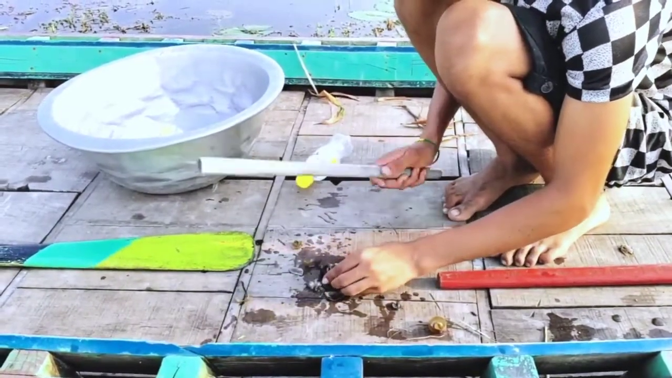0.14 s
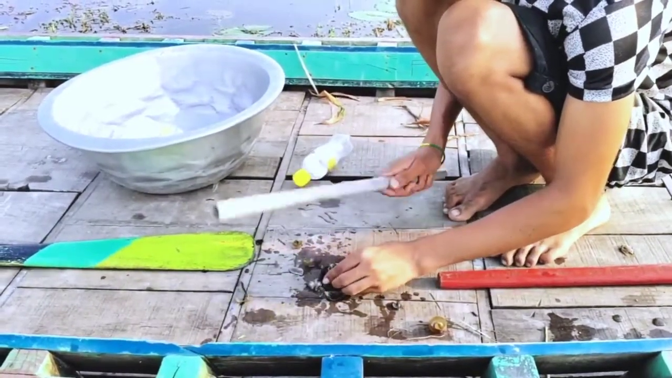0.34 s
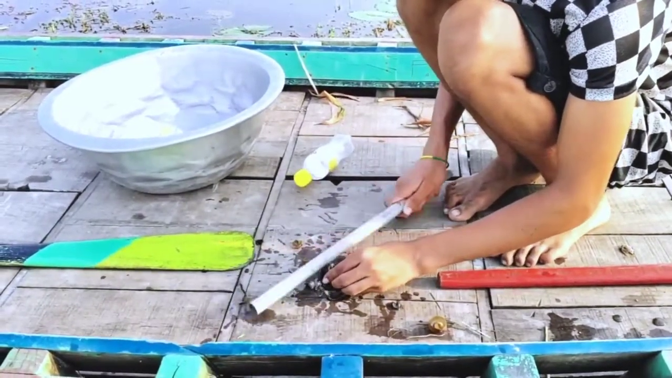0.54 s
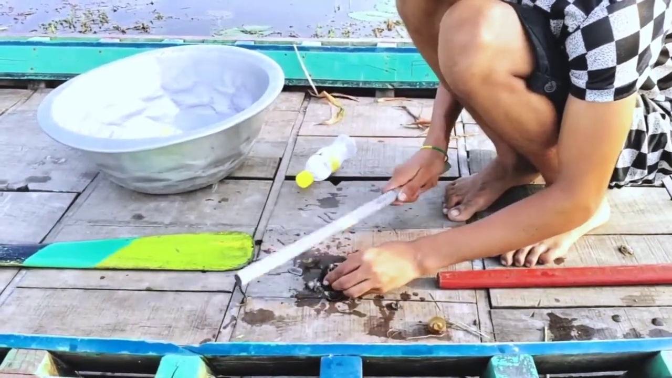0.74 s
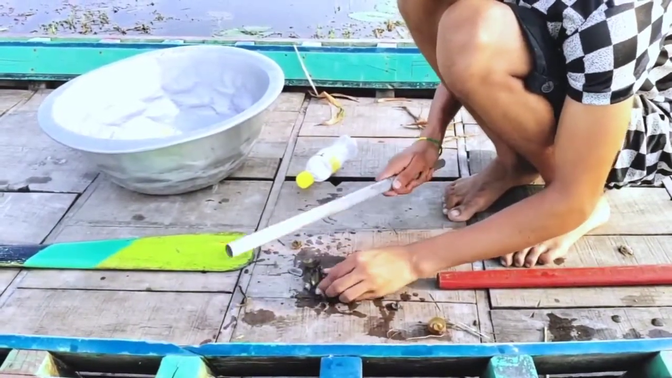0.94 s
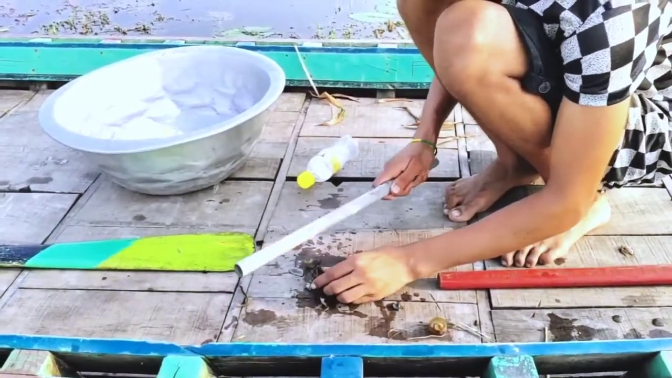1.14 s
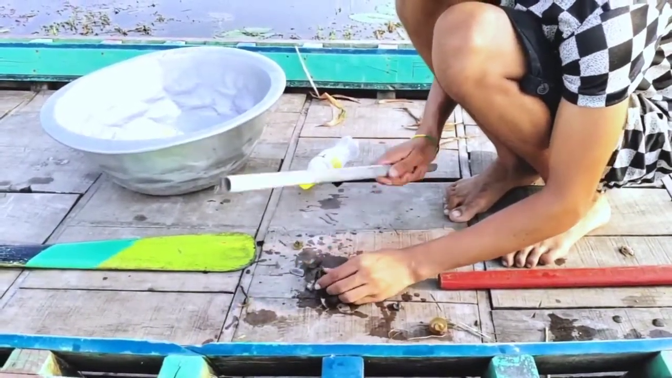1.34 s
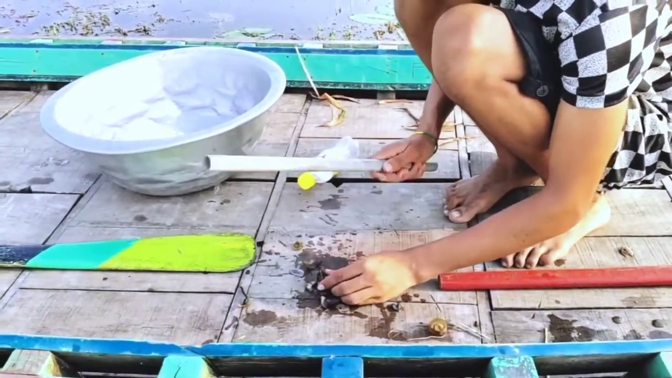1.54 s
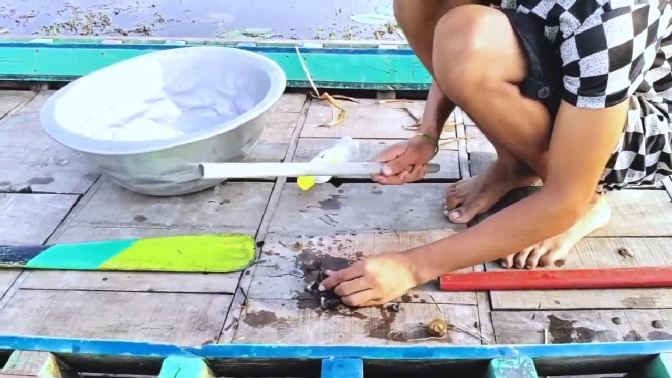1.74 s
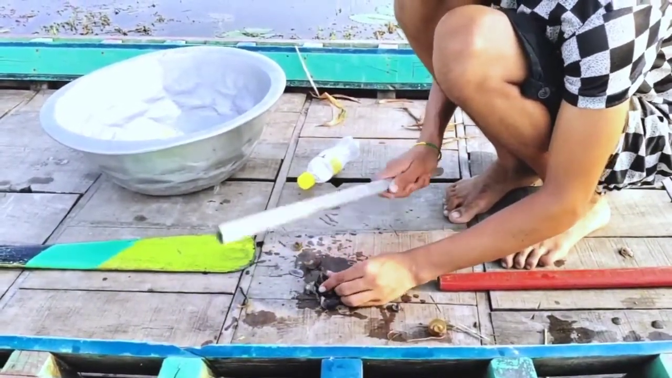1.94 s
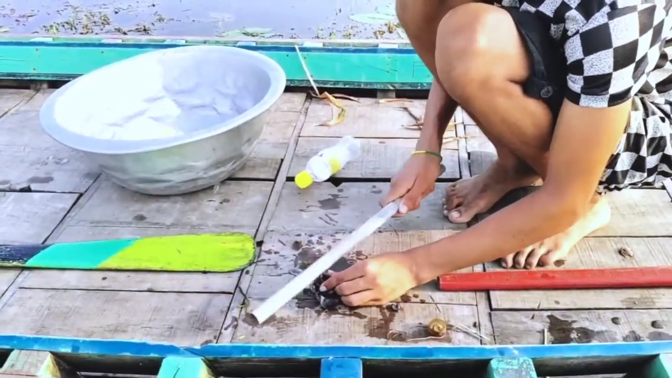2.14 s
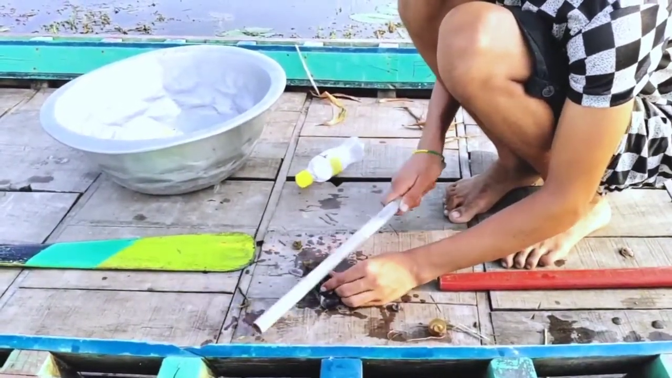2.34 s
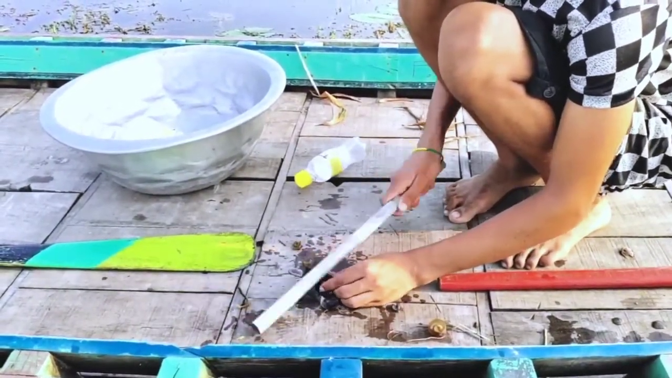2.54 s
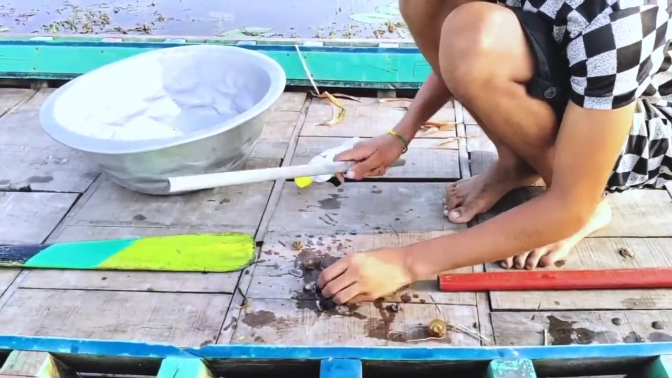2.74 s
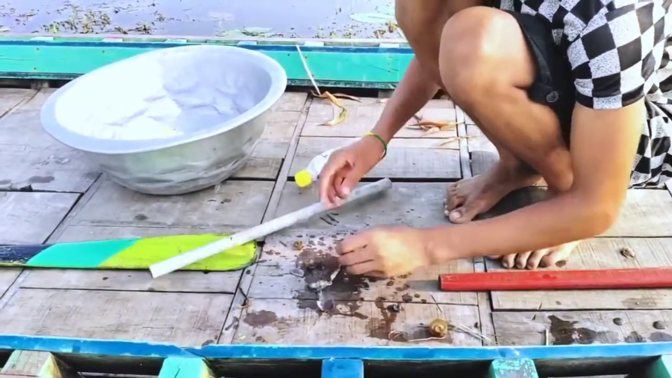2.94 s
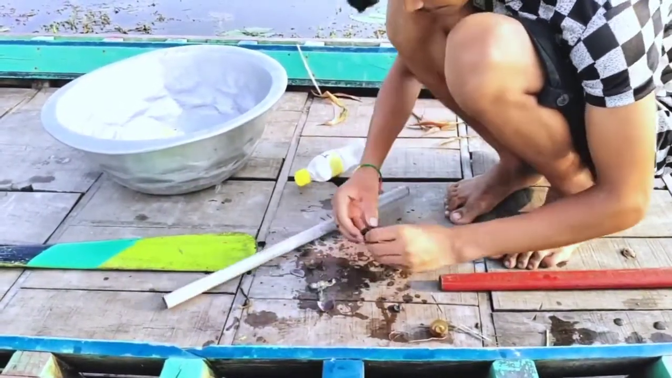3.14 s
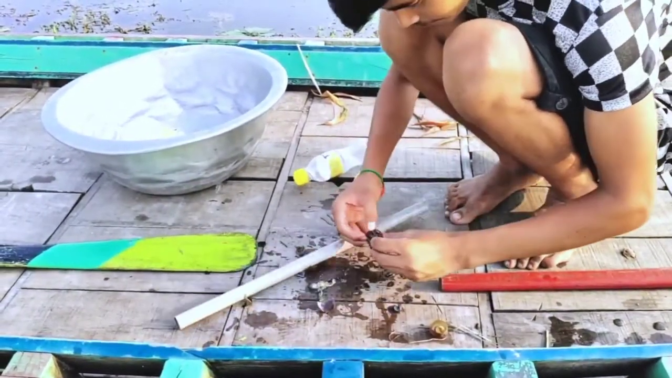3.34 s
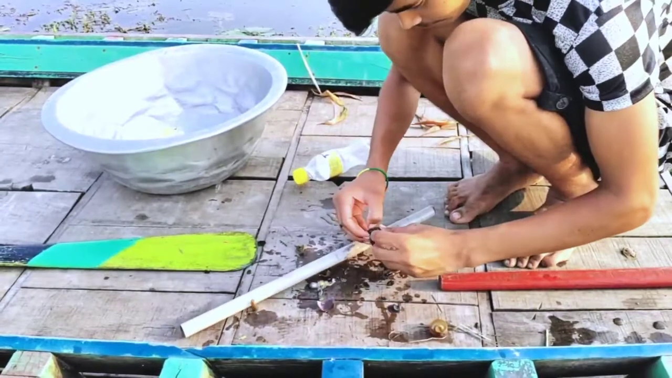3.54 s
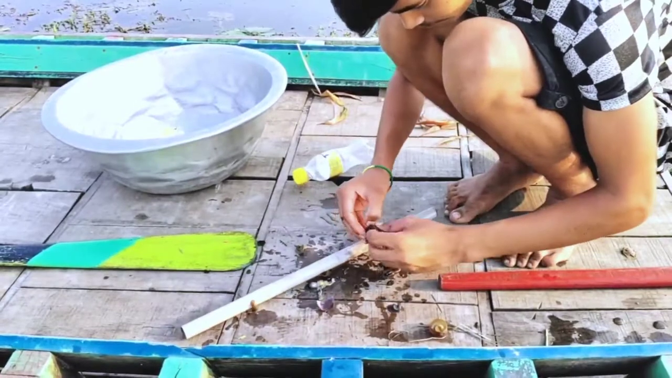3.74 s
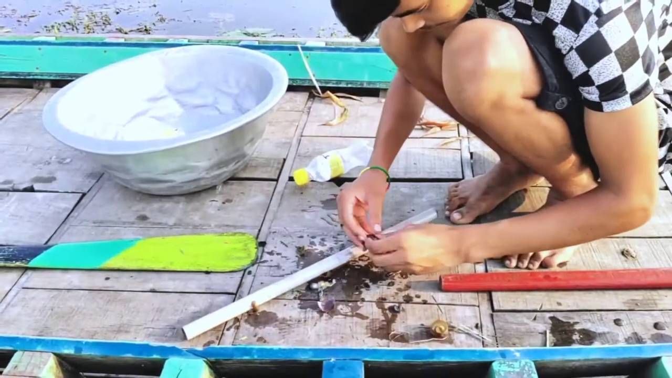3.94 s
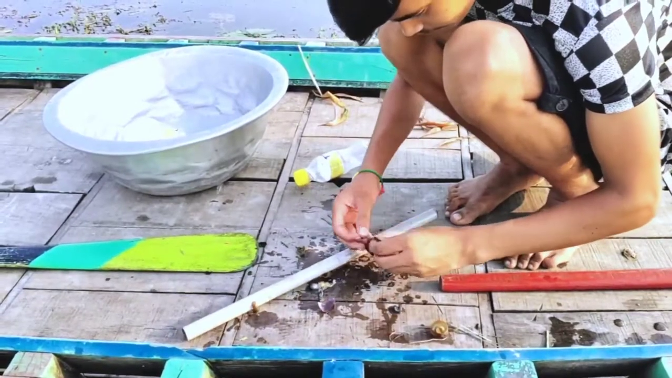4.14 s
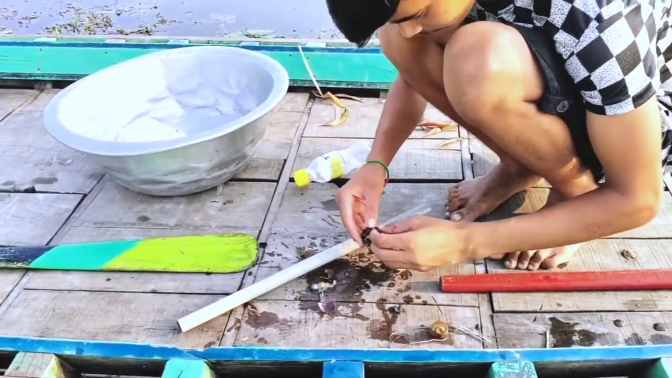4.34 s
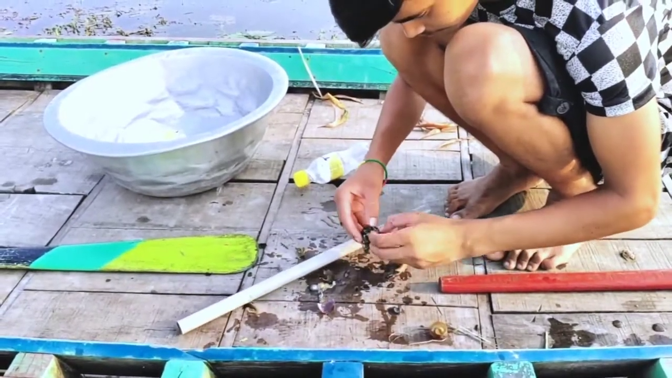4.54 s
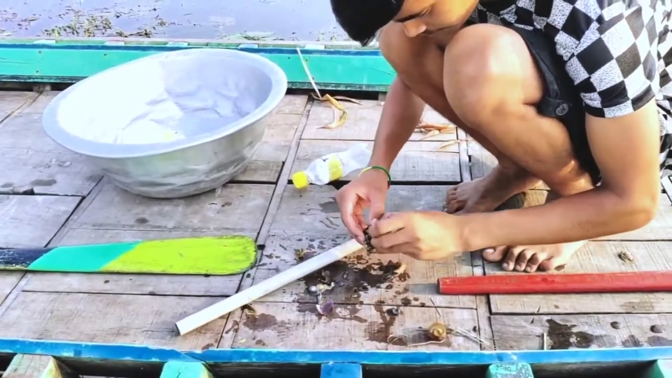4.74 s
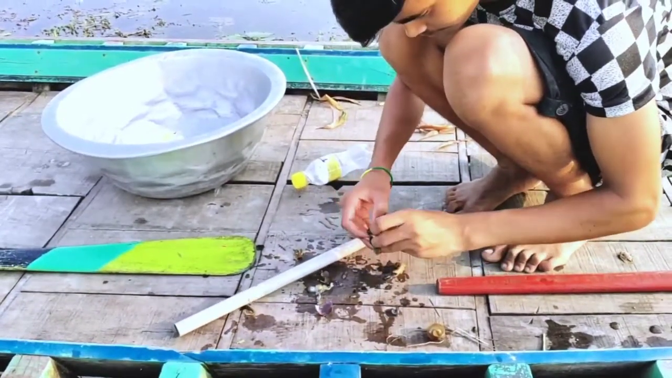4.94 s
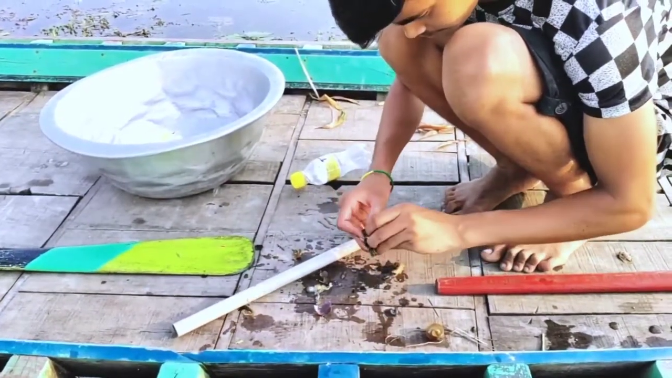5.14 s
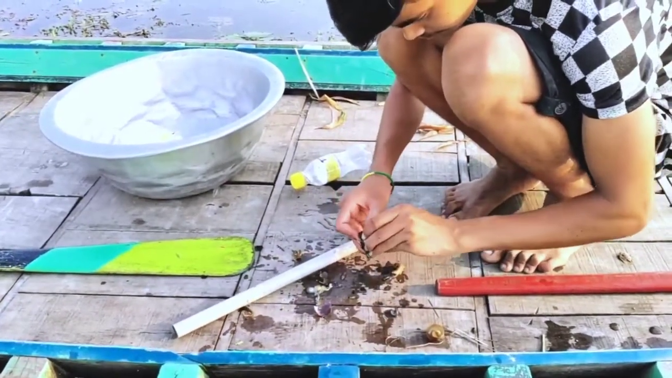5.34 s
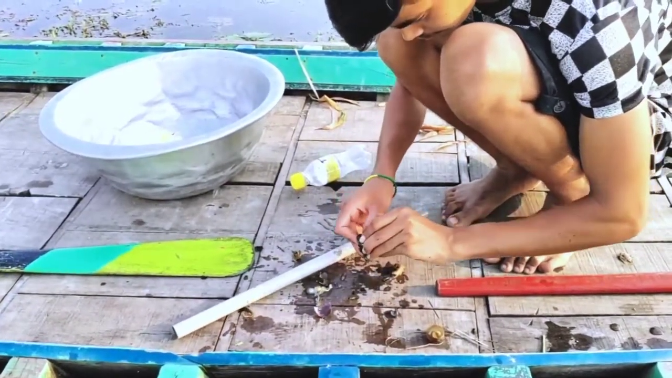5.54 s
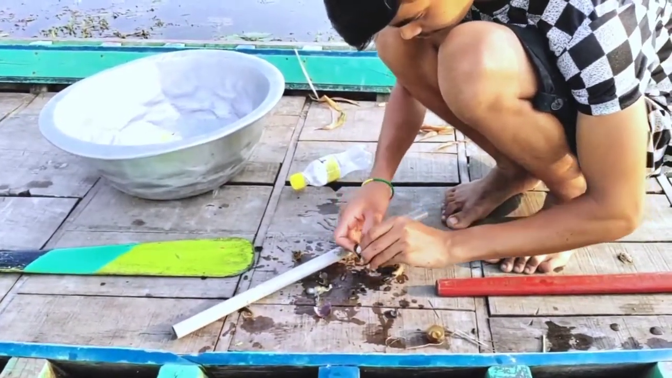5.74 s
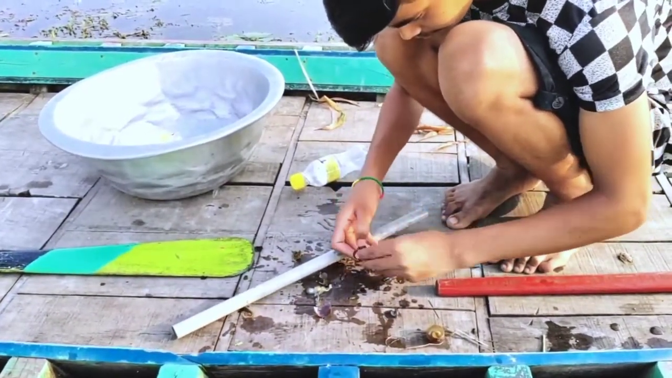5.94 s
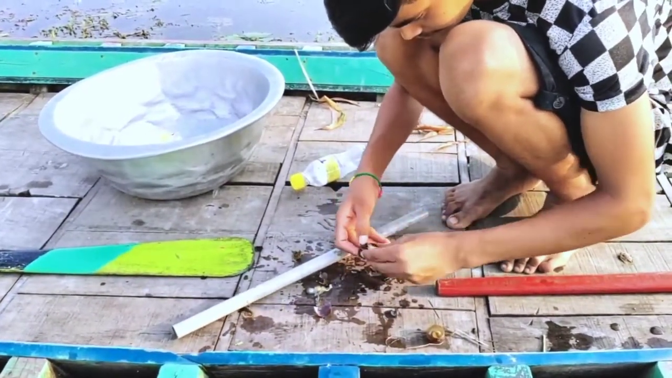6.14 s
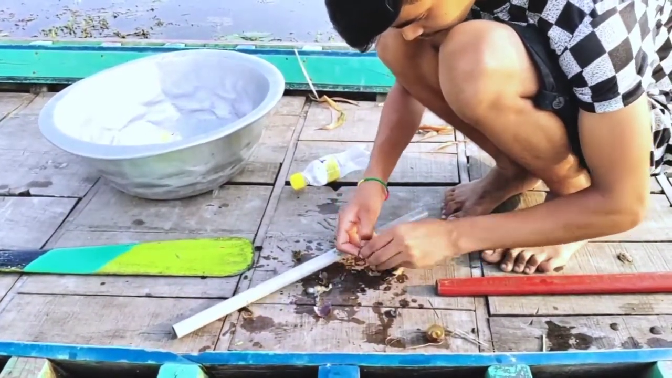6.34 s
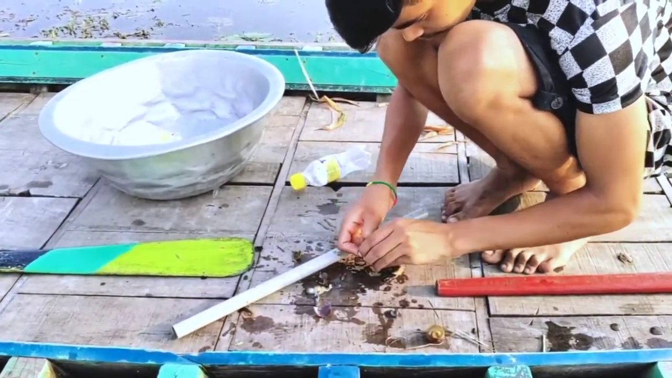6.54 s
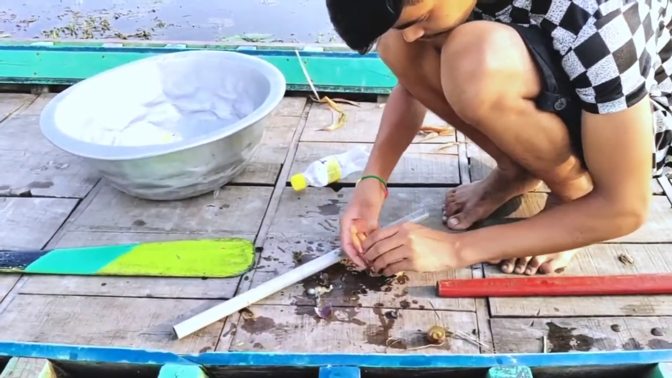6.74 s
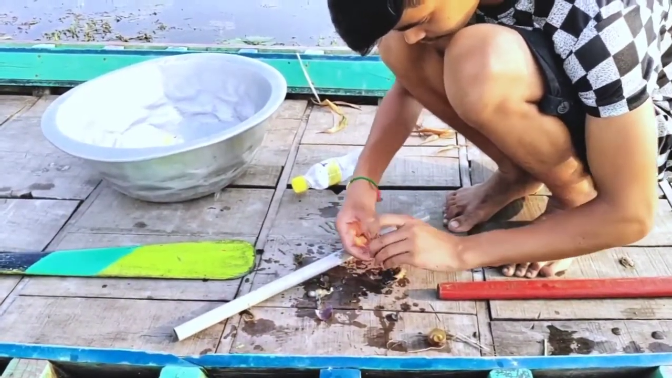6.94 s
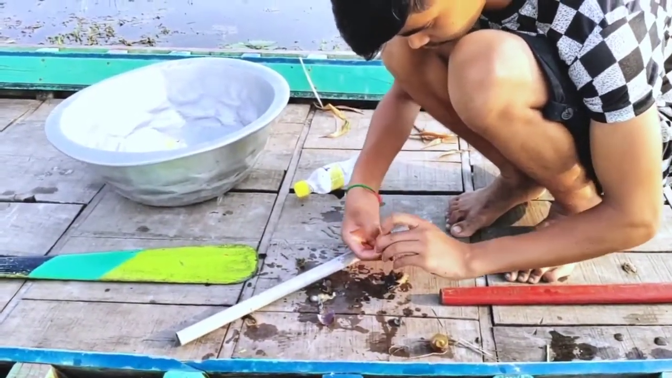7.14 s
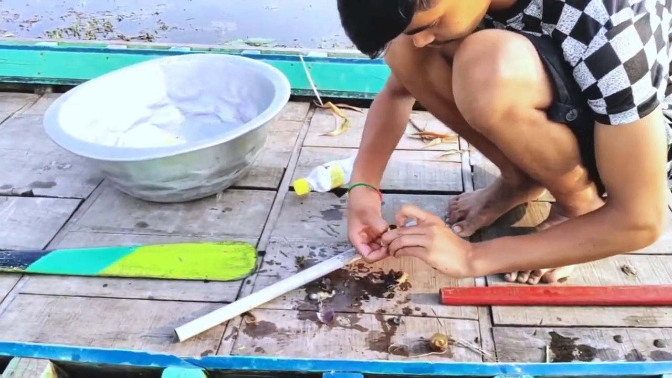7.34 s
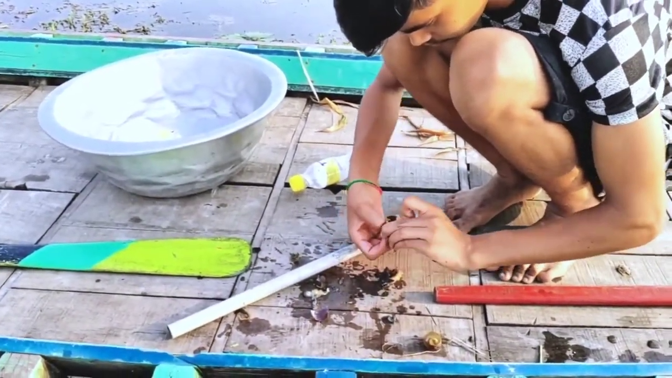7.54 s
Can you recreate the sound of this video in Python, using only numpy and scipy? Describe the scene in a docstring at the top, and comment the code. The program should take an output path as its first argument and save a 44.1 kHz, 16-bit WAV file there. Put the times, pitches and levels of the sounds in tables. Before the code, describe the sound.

Quick cracking knocks on a wooden boat deck, a bouncing pipe drop and low thuds, then quiet fiddling with shell over calm outdoor water ambience.

```python
"""A plastic pipe knocks snail shells on the planks of a wooden boat, is dropped and bounces, close to the microphone:
each blow drives modes of hull, deck, shell and pipe, with filtered noise for crack, crunch and wash.
Fingers tick, rustle and scrape at a shell as gritty noise; the hull rumbles and thuds as weight shifts.
Across the water a frog clucks in short sine blips, a far motor putts in noise puffs, insects hiss in
flickering narrow bands and a few birds whistle in gliding sines, over open air, broad hiss and wind."""
import sys
import numpy as np
from scipy import signal
from scipy.fft import rfft, irfft
from scipy.io import wavfile
from scipy.ndimage import uniform_filter1d

SR = 44100
rng = np.random.default_rng(int(sys.argv[2]) if len(sys.argv) > 2 else 0)


def generate_wav(sig):
    """Save sig (samples, or channels by samples) to the path in sys.argv[1] as 16-bit PCM at SR."""
    pcm = np.round(np.clip(np.atleast_2d(sig).T, -1, 1) * 32767).astype(np.int16)
    wavfile.write(sys.argv[1], SR, pcm)


N = 339217

# every contact of the pipe: start_s, level_db of the whole blow, then the layers under it: hull_boom_db,
# deck_db, shell_db, pipe_db, crack_db; chatter_s, rebound strength (0-1),
# share of its ring time that the hand leaves the pipe
CONTACTS = [(0.087, -6.5, -19.5, -5.5, -9.5, -10.5, -9, 0.041, 0.14, 0.34),
            (0.108, -19, -5, -10.5, -11, -23, -26, 0.014, 0.12, .35),
            (0.298, -4, -21, -7.5, -22, -11.5, -11, 0.036, 0.24, 0.44),
            (0.318, -16, -7, -13.5, -10, -16, -23, 0.019, 0.28, 0.24),
            (0.428, -45, -16, -12.5, -7, -15, -19.5, 0.014, 0, .35),
            (0.483, -8.5, -18, -16.5, -7, -6.5, -4, 0.038, 0.36, .4),
            (0.512, -9.5, -25.5, -4, -12, -16, -28.5, 0.046, 0.03, 0.39),
            (0.531, -17.5, -17, -7.5, -17.5, -19, -30.5, .025, 0, .35),
            (0.65, -4, -19.5, -8, -12.5, -9.5, -8, 0.044, 0.22, 0.26),
            (0.693, -12.5, -20, -5.5, -19, -22.5, -32.5, 0.024, 0, 0.29),
            (0.783, -11, -11.5, -2, -8.5, -6, -5.5, 0.028, 0.23, 0.3),
            (0.802, -17, -7.5, -6, -10, -18, -19, 0.025, 0.46, 0.45),
            (1.325, -20.5, -7, -5, -13, -2.5, -5, 0.044, 0.01, 0.21),
            (1.511, -15, -12, -5, -12.5, -9, -1.5, 0.034, 0.09, 0.59),
            (1.73, -9.5, -14, -11, -15.5, -14.5, -3.5, 0.034, 0.18, 0.23),
            (1.788, -42, -12, -7, -16, -20, -20, 0.026, 0.1, .35),
            (1.912, -11.5, -9, -9.5, -13, -9.5, 0, 0.037, 0.13, 0.32),
            (2.08, -9, -14.5, -5, -13, -16, -8, 0.037, 0.53, 0.37),
            (2.251, -9, -17.5, 1, -15, -17, -5.5, 0.03, 0.08, .35),
            (2.265, -14.5, -15.5, -9, -7.5, -12, -28, 0.026, 0.47, 0.32),
            (2.429, -9, -14.5, -3.5, -11.5, -16, -6.5, 0.052, 0.32, 0.55),
            (2.658, -9.5, -15, -3.5, -10.5, -11, -4, 0.032, 0.25, 0.4),
            (2.92, -43, -22.5, -34, -15, 7, -26, 0.014, 0.35, 0.44),
            (2.928, -8.5, -25, -22, -21, -5, -8.5, 0.015, 1, 0.64),
            (2.947, -13.5, -12, -10, -11.5, -24, -5.5, 0.026, 0.11, .5),
            (2.963, -9, -22.5, -28, -20, -6.5, -10.5, 0.017, 0.3, 0.67),
            (2.99, -20.5, -13.5, -25, -13, -6, -6, 0.049, 0.31, 0.85),
            (3.022, -34.5, 0, -20, -14, -9, -6, 0.049, 1, 0.97),
            (3.036, -27.5, 4, -2, -13, -25, -30, 0.012, 0.6, .5),
            (3.045, -20.5, -10, -6, -6.5, -15.5, -6, 0.02, 0.07, 0.45),
            (3.082, -21, -11, -6.5, -13.5, -28, -18, 0.0072, 1, 0.44),
            (3.097, -37, 1, -4, -11.5, -26, -26, 0.028, .5, .5),
            (3.141, -43, -4, -8, -11, -26, -30, 0.018, 0.7, .5),
            (3.107, -47, -16, -7, -14, -20, -19, .04, 0.4, .5)]


def undb(db):
    """Decibels to an amplitude factor."""
    return 10 ** (np.asarray(db) / 20)


def curve(rows):
    """Table rows to sample-rate columns."""
    s, *columns = np.transpose(rows)
    return [np.interp(np.arange(N) / SR, s, c) for c in columns]


def colour(x, points):
    """Filter by (Hz, dB) points, joined over log frequency."""
    hz, db = np.transpose(points)
    f = np.maximum(np.arange(x.shape[-1] // 2 + 1) * SR / x.shape[-1], 1)
    gain = undb(np.interp(np.log(f), np.log(hz), db))
    return irfft(rfft(x) * gain, x.shape[-1])


def unit(x):
    """Scale to an RMS of 1."""
    return x / np.sqrt(np.mean(x ** 2))


def peak(x, db):
    """Scale to a peak in dB."""
    return x * undb(db) / np.abs(x).max()


def pair(n, alike):
    """Two noises, left and right, that share a part."""
    mid, side = rng.standard_normal((2, n))
    alike = np.clip(alike, 0, 1)
    return np.sqrt((1 + alike) / 2) * mid + np.sqrt((1 - alike) / 2) * side * np.array([[1], [-1]])


def late(x):
    """The right port hears it later."""
    bank_lag_s = .00032
    return np.array([x[0], np.roll(x[1], int(bank_lag_s * SR))])


def band(x, hz, width):
    """One resonance, width in Hz."""
    return signal.lfilter(*signal.iirpeak(hz, hz / width, SR), x)


def band_twice(x, hz, width):
    """The same resonance twice, for steeper skirts."""
    return band(band(x, hz, width), hz, width)


def walk(rate):
    """Random levels held 1 / rate s and slewed twice."""
    k = int(SR / rate)
    steps = np.repeat(rng.standard_normal(N // k + 1), k)
    return 1.8 * uniform_filter1d(uniform_filter1d(steps, k), k)[:N]


def add(out, s, x, pan_db):
    """Mix x in at s seconds; pan is left minus right."""
    i = int(s * SR)
    x = x * undb(np.array([[pan_db], [-pan_db]]) / 2)
    out[:, i:i + x.shape[1]] += x[:, :N - i]


def swell(rows, rise, fall_db_s):
    """Gain over time of (s, dB, hold s) pushes: a ramp, a hold, an even fall in dB; powers add."""
    t, power = np.arange(N) / SR, 0
    for s, db, hold in rows:
        ramp = np.clip((t - s) / rise, 0, 1)
        fall_db = fall_db_s * np.maximum(t - s - rise - hold, 0)
        power = power + (ramp * undb(db - fall_db)) ** 2
    return np.sqrt(power)


def after(db, fall_db_s):
    """Gain of what each blow leaves behind."""
    return swell([(row[0], row[1] + db, 0) for row in CONTACTS], 0.023, fall_db_s)


def ring(modes, force, spread, scatter_db, free=1, detune=.03, loose=1, count=3):
    """Each mode is a cluster of close neighbours; a contact point weights them anew,
    each port hears its own phase; loose = 0 starts all modes in step."""
    t = np.arange(len(force)) / SR
    hz, db, t60 = np.repeat(np.transpose(modes), count, axis=1)[:, :, None]
    u = rng.standard_normal((4, len(hz), 1))
    fade = undb(db + scatter_db * u[0] - 60 * t / (free * t60))
    turn = 2 * np.pi * (hz * (1 + detune * u[1]) * t + loose * u[3])
    ports = np.array([(fade * np.sin(turn + spread * sign * u[2])).sum(0) for sign in (1, -1)])
    return signal.fftconvolve(ports, force[None])[:, :len(force)]


def wind():
    """Wind on the ports: deep noise, separate left and right, that swells slowly."""
    return unit(band_twice(pair(N, 0), 42, 50)) * undb(-79.0 + 2.2 * walk(3.1))


def open_air():
    """Open-air noise, nearly the same at both ports."""
    # spectrum of the air: frequency_hz, gain_db
    air_points = [(15, -24.5), (25, 0), (157, 6), (1160, -16), (1440, -94.5), (1610, -13.5), (2410, -27.5),
                  (4030, -52), (4610, -40.5), (6560, -10), (7510, -29), (13600, -24.5), (16000, -28)]
    air_db = -71
    return late(unit(colour(pair(N, 0.94), air_points))) * undb(air_db + 3.0 * walk(8.7))


def hiss():
    """A broad hiss that the blows stir up and that sinks evenly in dB to its resting level."""
    under_blow_db, fall_db_s, rest_db = -64, 74, -90.5
    stirred = undb(rest_db) + after(under_blow_db, fall_db_s)
    points = [(600, -7.0), (1500, 7.0), (4000, 1.0), (9000, 0.5), (15000, -5.0), (15500, -35.0)]  # Hz, dB
    return unit(colour(pair(N, 0.24), points)) * stirred * undb(1.7 * walk(23))


def insects():
    """Narrow noise bands that flicker alone, louder on the right."""
    # voices of the chorus: frequency_hz, filter_width_hz, level_db
    voices = [(1623, 160, 3.5), (1890, 150, -2.5), (2090, 110, -4), (2220, 50, -13.5), (2610, 110, -4.5),
              (2850, 140, -6.5), (3144, 200, -1.5), (3380, 130, -6.5), (3620, 87, -10.5), (3982, 260, 2.5),
              (4302, 230, -0.5), (4980, 170, -7), (5430, 270, -5), (5580, 170, -3.5), (6070, 290, -4.5),
              (6400, 260, 1.5), (6700, 300, -1.5), (6900, 110, -8)]
    # the whole chorus: time_s, level_db
    chorus_levels = [(0.0, -61.5), (0.9, -67.5), (1.7, -76.5), (2.33, -68), (2.85, -77.5), (4.15, -73),
                     (6.2, -71.5), (6.4, -77.5), (7.1, -68), (7.69, -81)]
    bands = 0
    for hz, width, db in voices:
        flicker_db = 2 * walk(18) + 2.9 * walk(2.5)
        voice = band(band_twice(pair(N, 0.14), hz, width), hz, width)
        bands = bands + undb(db + flicker_db) * unit(voice)
    (level_db,) = curve(chorus_levels)
    return unit(late(bands)) * undb(level_db + np.array([[-1.5], [1.5]]))


def birds():
    """Far gliding whistles, blurred by the air."""
    # whistles: start_s, length_s, start_hz, middle_hz, end_hz, level_db
    whistles = [(1.24, 0.05, 4900, 5100, 4700, -63.5), (5.854, 0.075, 4670, 4660, 4620, -78),
                (1.533, 0.22, 1280, 1490, 1640, -71.5), (3.544, 0.35, 1760, 2086, 2180, -77.5),
                (3.769, 0.081, 4980, 4650, 4300, -73), (5.299, 0.73, 2103, 2094, 2090, -78.5),
                (5.3, .13, 2110, 1970, 2010, -86), (6.51, 0.13, 2070, 2070, 2060, -78.5),
                (6.787, 0.21, 1700, 1923, 1965, -72.5), (6.855, 0.3, 2060, 2160, 2130, -75)]
    out = np.zeros((2, N))
    for s, length, *hz, db in whistles:
        u = np.linspace(0, 1, int(length * SR))
        pitch = np.polyval(np.polyfit([0, .5, 1], hz, 2), u)
        slow = uniform_filter1d(rng.standard_normal((2, len(u))), 400)
        blur = unit(uniform_filter1d(slow, 400))
        turn = 2 * np.pi * np.cumsum(pitch) / SR
        x = np.sin(np.pi * u) * ((1 + blur[0]) * np.sin(turn) + blur[1] * np.cos(turn))
        add(out, s, undb(db) * np.array([np.roll(x, 9), x]), -4.0)
    return out


def motor():
    """A far single-cylinder motor, louder on the right: even puffs whose strength wavers with the air."""
    # resonances of the puffs: frequency_hz, filter_width_hz, level_db
    resonances = [(780, 200, -9.5), (1240, 88, -5.5), (1270, 33, -4.5), (3660, 2300, -1.5),
                  (4050, 400, 2.5), (5470, 630, 1)]
    first_s, period_s = .0598, .0616
    since = (np.arange(N) / SR - first_s) % period_s
    puffs = pair(N, 0.17) * np.exp(-since / 0.0091) * np.minimum(since / 0.0031, 1)
    x = 0
    for hz, width, db in resonances:
        x = x + undb(db + 1.6 * walk(27)) * unit(band_twice(puffs, hz, width))
    return x * undb(-93.0 + np.array([[-2.0], [2.0]]))


def putts():
    """Now and then a putt of the motor carries hollow over the water: a ragged puff in two resonances."""
    # putts that stand out of the beat: start_s, peak_db, pitch_hz, overtone_db against the pitch
    hollow_putts = [(.245, -54.5, 860, -10), (.737, -46.5, 800, -4), (1.045, -79, 1130, -10),
                    (1.785, -51, 874, -4), (1.847, -62, 860, -12), (1.97, -51, 800, -2),
                    (4.371, -71, 795, -3), (4.68, -72, 850, -4.5), (4.741, -72, 897, 0),
                    (4.803, -71.5, 800, -3.5), (5.05, -70, 1044, -4), (5.111, -74, 880, 1),
                    (5.173, -72, 900, 3), (5.604, -68.5, 900, -3), (5.912, -69.5, 800, -11),
                    (6.158, -73, 890, 2), (7.145, -67, 1200, -10), (1.107, -60, 730, -3),
                    (1.169, -59.5, 692, -5.5), (1.23, -73, 824, -35), (1.415, -64, 830, -30),
                    (1.661, -60, 870, -43.5), (2.832, -69.5, 884, -28), (3.325, -57, 816, -30),
                    (3.571, -51.5, 712, -5), (3.694, -64, 877, -11), (3.756, -59, 813, -31),
                    (4.19, -65.5, 830, -32), (3.277, -59, 860, -28), (4.433, -61, 770, -23),
                    (4.495, -64, 845, -25.5), (4.556, -51, 972, -6), (4.618, -54.5, 1014, -18),
                    (4.865, -54.5, 880, -8.5), (4.925, -52, 890, -3), (4.987, -70.5, 880, -20),
                    (5.234, -61.5, 749, -7), (5.296, -56, 872, -13.5), (5.357, -63, 855, -6.5),
                    (5.419, -60.5, 850, -8), (5.481, -64, 834, -16), (5.542, -60, 836, -4),
                    (5.727, -53.5, 746, -3), (5.789, -59.5, 834, -23), (6.035, -61.5, 808, -31),
                    (6.096, -56.5, 864, -11), (6.219, -56.5, 935, 1), (6.28, -62.5, 855, -6),
                    (6.343, -58.5, 790, 0), (6.405, -66.5, 808, 16), (6.466, -64.5, 783, -21.5),
                    (6.528, -60.5, 830, -9), (6.589, -59.5, 1020, 11), (6.651, -62.5, 975, 10),
                    (6.897, -57.5, 732, -1), (6.959, -68, 944, -11), (7.021, -63, 960, 11),
                    (7.328, -66, 920, 20.5)]
    rise_s, fall_s, width_hz, overtone_hz = 0.0029, 0.012, 100, 1266
    out, t = np.zeros((2, N)), np.arange(int(.1 * SR)) / SR
    shape = np.minimum(t / rise_s, 1) * np.exp(-np.maximum(t - 2 * rise_s, 0) / fall_s)
    for s, db, hz, overtone_db in hollow_putts:
        x = 0
        for f, gain_db in ((hz, 0), (overtone_hz, overtone_db)):
            # the filter settles before the part that is kept
            breathy = band_twice(rng.standard_normal(3 * len(t)), f, width_hz)[-len(t):]
            x = x + undb(gain_db) * shape * (np.sin(2 * np.pi * f * t) + 0.66 * unit(breathy))
        add(out, s, peak(np.array([np.roll(x, 5), x]), db), -.6)
    return out


def rasps():
    """Short gritty puffs of exhaust gas in the upper mids."""
    # rasps that stand out of the beat: time_s, peak_db, frequency_hz, left_minus_right_db
    exhaust_rasps = [(4.2454, -68.5, 4040, -7.5), (4.7398, -66.5, 4200, -5), (4.928, -65, 3930, -8),
                     (5.0524, -66, 3860, -11), (5.1716, -65, 3580, -10.5), (5.239, -70, 3990, -5.0),
                     (5.418, -68, 3520, -9.5), (5.5424, -65, 3550, -10.5), (5.668, -63, 3860, -9.0),
                     (5.727, -56, 3620, -10), (5.8012, -68, 3940, -10.0), (5.8581, -62.5, 4020, -10),
                     (5.929, -60.5, 4650, -6), (5.9766, -66.5, 3920, -11.5), (6.0407, -61, 3880, -9.5),
                     (6.0963, -60, 3920, -10.5), (6.2796, -59, 4100, -6.0), (6.3494, -75, 4420, -3.5),
                     (6.6577, -62, 3970, -11), (6.774, -61.5, 3820, -10), (6.8365, -66, 3990, -7),
                     (6.9007, -52.5, 3760, -7), (6.9576, -59, 3910, -10.0), (7.0255, -61, 4010, -9),
                     (7.0858, -64, 4010, -12), (7.143, -56.5, 3880, -8)]
    rise_s, fall_s, width_hz = .003, 0.015, 670
    out, t = np.zeros((2, N)), np.arange(int(.1 * SR)) / SR
    shape = np.minimum(t / rise_s, 1) * np.exp(-t / fall_s)
    for s, db, hz, pan_db in exhaust_rasps:
        puff = band_twice(pair(len(t), 0.21) * shape, hz, width_hz)
        add(out, s - rise_s, peak(puff, db), pan_db)
    return out


def blip(hz, length):
    """A slightly rough sine blip, echoed from the bank; the right port hears it first."""
    t = np.arange(int(.1 * SR)) / SR
    shape = np.sin(np.pi * np.clip(t / length, 0, 1)) ** 4.3
    rough = 1 + 0.5 * unit(uniform_filter1d(rng.standard_normal(len(t)), 60))
    x = shape * rough * np.sin(2 * np.pi * hz * t)
    x = x + 0.17 * np.roll(x, 900)
    return np.array([np.roll(x, 5), x])


def frog():
    """Short low clucks at an even pace, each a little different in pitch and level."""
    # how loud the clucks are: time_s, mean peak_db
    cluck_levels = [(0.0, -53), (1.0, -60), (1.3, -68.5), (3.5, -63.5), (4.302, -66), (5.2, -62.5),
                    (5.75, -55.5), (5.85, -78.5), (6.9, -71), (7.69, -79)]
    first_s, period_s, cluck_s, mean_hz, scatter_db = .085, .0991, .018, 635, 4
    out, (s, db) = np.zeros((2, N)), np.transpose(cluck_levels)
    for at in np.arange(first_s, N / SR, period_s):
        u = rng.standard_normal(2)
        cluck = blip(mean_hz * (1 + 0.038 * u[0]), cluck_s)
        add(out, at, peak(cluck, np.interp(at, s, db) + scatter_db * u[1]), 3.5)
    return out


def hull():
    """Soft uneven pushes of feet and water keep the lowest plank modes going; a few are clear thuds."""
    # weight shifting on the planks: start_s, level_db, hold_s
    shifts = [(0.0, -54.5, 0.031), (2.74, -62.5, 0.023), (2.97, -40.5, 0.51), (3.3, -42.5, 0.12),
              (3.46, -42.5, 0.16), (3.56, -43, 0.18), (3.8, -52.5, 0.2), (4.0, -47.5, 0.045),
              (4.07, -58, .07), (4.2, -53.5, 0.049), (4.68, -70, 0.21), (5.1, -68.5, 0.13),
              (6.03, -63, 0.038), (6.72, -53.5, 0.075), (6.9, -60.5, 0.025), (7.1, -61.5, 0.14)]
    # clear thuds: start_s, peak_db, pitch_hz, t60_s
    thuds = [(3.225, -26, 154, 0.055), (3.58, -36.5, 130.4, 0.11), (3.674, -28.5, 146, 0.052),
             (4.013, -39.5, 105.7, 0.069), (4.128, -44.5, 141.4, 0.11), (6.044, -56.5, 89, 0.17),
             (6.722, -45.5, 120, 0.031), (6.748, -45, 129, 0.081), (6.79, -45.5, 130, 0.23),
             (1.464, -48.5, 377, 0.054), (3.124, -46, 500, 0.069), (3.145, -47.5, 683, .07),
             (3.193, -47.5, 640, 0.091), (3.26, -58, 655, 0.065), (3.365, -41.5, 472, 0.033),
             (3.384, -39, 419, 0.042)]
    # where the weight bears: time_s, left_minus_right_db
    bearing = [(2.9, 2), (3.6, 2.5), (4.0, 8), (4.4, -2), (6.6, -1), (6.74, 14), (6.95, -1), (7.69, -3)]
    rise_s, fall_db_s, rest_db = 0.011, 160, -86.5
    under_blow_db, blow_fall_db_s = -52.5, 83.5  # rumble left by a blow
    push = swell(shifts, rise_s, fall_db_s) + after(under_blow_db, blow_fall_db_s) + undb(rest_db)
    strength = undb(3. * walk(60))
    body = 0
    # plank modes: Hz, filter width Hz, dB, share alike at both ports
    for hz, width, db, alike in ((91, 110, 0.0, 0.075), (146, 83, 3.5, 0.21), (191, 115, -5.5, 0.25)):
        body = body + undb(db) * band_twice(strength * pair(N, alike), hz, width)
    out, t = unit(body) * push, np.arange(int(.2 * SR)) / SR
    for s, db, hz, t60 in thuds:
        x = np.sin(2 * np.pi * hz * t) * undb(-60 * t / t60) * np.minimum(t / 0.0043, 1)
        add(out, s, peak(x, db)[None], 0)
    return late(out) * undb(curve(bearing)[0] * np.array([[.5], [-.5]]))


def rustle():
    """Fingers on wet shell: sparse tiny crackles, each smeared by a short ring, louder on the right."""
    # the rustling: time_s, level_db
    crackle_levels = [(3.1, -76), (3.3, -76), (3.44, -73), (3.6, -82), (3.999, -91.5), (4.3, -89),
                      (4.43, -79.5), (4.6, -94), (5.35, -90), (5.7, -85), (5.85, -93.5), (6.18, -77.5),
                      (6.5, -88.5), (7.129, -78.5), (7.358, -93), (7.69, -97)]
    (db,) = curve([(3.05, -130), *crackle_levels])
    sparse_db = 3 * np.minimum(rng.exponential(size=N), 7) + 3.5 * walk(50)
    grains = pair(N, .2) * undb(sparse_db)
    x = unit(band_twice(grains, 3200, 3300)) + .5 * unit(band_twice(grains, 1100, 900))
    return x * undb(db + np.array([[-2.5], [2.5]]))


def ticks():
    """Fingers and shell scraps: short noise snaps with a faint ring and a gritty tail."""
    # ticks: start_s, body peak_db, ring_hz, treble_db against the body, left_minus_right_db
    tick_rows = [(1.833, -52, 3700, -2, 8), (3.194, -44, 1290, -49, 0), (3.24, -37.5, 2820, 0.5, -4),
                 (3.256, -51, 1290, -19, -2.5), (3.3405, -44, 2850, 2, -3), (3.363, -40, 1470, -38, -0.5),
                 (3.393, -54, 2780, -14, -1), (3.418, -42, 2500, -7, 2), (3.446, -45, 5100, -7, -1),
                 (3.53, -44.5, 5120, 0, 1), (4.3133, -44, 5360, 3.5, 0), (4.39, -47, 2840, -7, -2),
                 (4.4, -56, 3030, -16, -6), (4.42, -58, 5000, -12, -3), (4.446, -59, 4490, -18, -1),
                 (4.6235, -63, 4300, -2, 4), (5.125, -56, 6080, -27.5, -5), (5.239, -57, 5640, -27, -9),
                 (5.7454, -48.5, 5280, -0.5, 1.5), (5.95, -67, 1714, 6.5, -7), (6.1294, -56, 4010, -1, 0),
                 (6.2, -38, 2240, -12, -5), (6.2, -39.5, 1370, -13, -2.5), (3.294, -61, 9550, -2, -4),
                 (3.326, -62, 9500, -3, 0), (3.355, -54, 6300, 2, 2), (3.208, -55, 5000, -20, -4),
                 (3.391, -59, 9500, -2, 0), (3.597, -65, 9300, 0, -2), (3.615, -60.5, 4200, -22, 0),
                 (4.284, -62, 4300, -19, -4), (6.901, -58, 5530, -11.5, -10), (6.931, -66, 1860, 7, -1),
                 (7.194, -53, 1760, -18, -12)]
    # snap of a shell scrap: frequency_hz, filter_width_hz, level_db
    scrap_modes = [(1610, 550, -5.5), (2730, 420, 1), (4120, 450, -0.5), (5250, 650, -0.5),
                   (6430, 830, -1.5)]
    fall_s, snap_db, snap_follows = 0.0059, 9, 0.32  # the snap follows the treble by this share
    out, t = np.zeros((2, N)), np.arange(int(.12 * SR)) / SR
    for s, db, hz, treble_db, pan_db in tick_rows:
        snap = pair(len(t), 0.16) * np.exp(-t / fall_s) * np.minimum(t / 0.00034, 1)
        uneven_db = 4 * rng.standard_normal(len(t) // 100 + 1).repeat(100)[:len(t)]
        tail = pair(len(t), 0.155) * np.exp(-t / 0.045) * undb(uneven_db)
        burst = snap + 0.13 * tail
        ringing = band(band(burst, hz, 0.13 * hz), hz, 0.64 * hz)
        scrap = 0
        for f, width, gain_db in scrap_modes:
            scrap = scrap + undb(gain_db + 3.5 * rng.standard_normal()) * band_twice(burst, f, width)
        body = peak(ringing, 0) + peak(scrap, snap_db + snap_follows * treble_db)
        treble = band_twice(snap, 9600, 1100) + 0.42 * band_twice(snap, 11300, 5300)
        add(out, s, peak(body, db) + peak(treble, db + treble_db), pan_db)
    return out


def scrape():
    """One gritty wet scrape of the fingers, louder on the right."""
    start_s, level_db, rise_s, hold_s, fall_db_s, treble_db = 7.228, -59, 0.0092, 0.034, 1098, 0.5
    grit = pair(N, 0.096) * undb(2.3 * rng.exponential(size=N) + 2.4 * walk(90))
    wet = unit(band(band(grit, 2530, 2700), 2900, 2500))
    wet = wet + undb(treble_db) * unit(band(grit, 5500, 6600))
    push = swell([(start_s, level_db, hold_s)], rise_s, fall_db_s)
    return wet * push * undb(np.array([[-5.5], [5.5]]))


def wash(t):
    """Loose planks over the hollow hull answer a blow with a ragged diffuse tail, longest in the bass."""
    # bands of the tail: frequency_hz, filter_width_hz, level_db, t60_s
    tail_bands = [(149, 87, -3.5, 0.39), (279, 130, -1, 0.37), (520, 190, -6.5, 0.25),
                  (1110, 1800, -14.5, 0.13), (2200, 4500, -17, 0.28), (4500, 4200, -19.5, 0.13)]
    tail = 0
    for hz, width, db, t60 in tail_bands:
        ragged = undb(4 * unit(uniform_filter1d(rng.standard_normal(len(t)), 200)))
        noise = band_twice(ragged * pair(len(t), 400 / hz), hz, width)
        tail = tail + unit(noise) * undb(db - 60 * t / t60)
    return tail * np.minimum(t / 0.0075, 1)


def blows():
    """A first contact and a chatter of rebounds, ended when the pipe lifts, drive deck, shell and pipe;
    the shell's edge cracks."""
    # modes of hull, deck, and what rings on under the knock: frequency_hz, level_db, t60_s
    boom_modes = [(90, -19, 0.017), (136.2, -8, 0.12), (164.4, -5, 0.41), (198.2, 7, 0.13),
                  (250.2, -6, 0.081)]
    deck_modes = [(304, -17.5, 0.17), (382, -4, 0.2), (431, 0, 0.072), (474.6, 5, 0.057), (520, -6, 0.076),
                  (592, -11, 0.07), (706.6, -6, 0.21), (800, -10.5, 0.047), (960, -12.5, 0.023)]
    linger_modes = [(286.9, 0.5, 0.22), (800, -18.5, 0.37), (1280, -20.5, 0.38), (1750, -23.5, 0.31),
                    (2200, -28, .2)]
    # modes of shell, pipe and the shell's edge: frequency_hz, level_db, t60_s if undamped
    shell_modes = [(1036, -10.5, 0.088), (1251, -7, 0.12), (1404, 0.5, 0.092), (1520, -13, 0.42),
                   (1630, -9, 0.084), (1741.5, -1.5, 0.2), (1808, -11.5, 0.35), (2070, -17, 0.067)]
    pipe_modes = [(1300, -9, .04), (2280, -9, .04), (2510, -4, .04), (2800, -2, .05), (3020, 3, .07),
                  (3260, -6, .04), (3540, -7, .04), (3750, -8, .04), (4200, -6, .035), (4450, -8, .035)]
    edge_modes = [(4900, -5.5, 0.025), (5324, -5, 0.2), (5500, -8, 0.035), (7130, -5.5, 0.25),
                  (7190, -4.5, 0.032), (9700, -11.5, 0.019), (9160, 2.5, 0.17), (4780, -4.5, 0.052),
                  (10100, -6.5, 0.0091), (10500, -9.5, 0.026), (12200, -13, 0.03)]
    # spectrum of the crack: frequency_hz, gain_db
    crack_points = [(2060, -10), (3500, -10), (4280, -0.5), (6190, -11), (7290, -12), (8970, -10.5),
                    (12300, -15), (13200, -16.5), (15400, -24.5), (16500, -23)]
    rise_s = 0.0025  # each blow swells in over about 2 ms
    split_s, split_db = 0.002, 3.5  # the shell splits in one short snap around the end of the rise
    plank_rebound = 0.68  # share of each rebound that reaches the planks
    linger_db = -18  # under the deck
    out, t = np.zeros((2, N)), np.arange(int(.4 * SR)) / SR
    short = int(.15 * SR)
    for s, db, boom_db, deck_db, shell_db, pipe_db, crack_db, chatter, rebound, free in CONTACTS:
        touch = np.exp(-t / 0.03 - (t / max(chatter, .002)) ** 4)
        rebounds = (rng.random(short) < 700 / SR) * rng.standard_normal(short)
        force = rebound * rebounds * touch[:short]
        force[0] = 1
        # the planks feel the blow through the soft snail
        plank_force = force * np.r_[1, np.full(short - 1, plank_rebound)]
        push = np.convolve(plank_force, np.hanning(30))[:short]
        long_force = np.r_[force, np.zeros(len(t) - short)]

        ragged = undb(3.6 * unit(uniform_filter1d(rng.standard_normal(len(t)), 40)))
        grit = (undb(-60 * t / 0.034) + 1.4 * rebound * touch) * ragged
        split = undb(split_db) * np.exp(-((t - rise_s) / split_s) ** 2)
        crack = colour(pair(len(t), 0.24), crack_points) * (grit + split) * np.minimum(t / 0.00062, 1)
        x = undb((boom_db + deck_db) / 2 - 14.5) * wash(t) + peak(crack, crack_db)

        crunch = pair(len(t), 0.45) * grit  # splintering fills the gaps between the modes
        x += peak(band_twice(crunch, 1300, 1900), shell_db + 1.0)
        x += peak(band_twice(crunch, 2500, 2600), pipe_db - 1.0)

        x[:, :short] += peak(ring(boom_modes, push, 0.15, 2.3, detune=0.03, loose=.1), boom_db)
        x[:, :short] += peak(ring(deck_modes, push, 0.03, 2.5, detune=.035, loose=.1, count=4), deck_db)
        x += peak(ring(linger_modes, long_force, .4, 4.0, detune=.035, count=5), deck_db + linger_db)
        shell = ring(shell_modes, force, 0.5, 1.8, free=0.29, detune=0.024, count=5)
        x[:, :short] += peak(shell, shell_db - 0.5)
        x[:, :short] += peak(ring(pipe_modes, force, 1.0, 3.0, free=free, detune=0.013, count=3), pipe_db)
        edge_force = force * np.exp(-t[:short] / .012)
        edge = ring(edge_modes, edge_force, 2, 3, free=.18, detune=.05, count=4)
        x[:, :short] += peak(edge, crack_db - 3)
        add(out, s, undb(db) * x * np.minimum(t / rise_s, 1) ** 0.84, -.3)
    return out


def scene():
    """The blows up close, hands and hull around them, the far water behind."""
    # the microphone takes in little deep bass from the blows
    near = signal.sosfilt(signal.butter(3, 95, "high", fs=SR, output="sos"), blows())
    boat = near + ticks() + scrape() + rustle() + hull()
    water = frog() + motor() + putts() + rasps() + birds()
    return boat + water + insects() + open_air() + hiss() + wind()


def record(dry):
    """The two ports differ in the mid treble; the loudest peaks are rounded, the top is cut."""
    # balance of the ports: frequency_hz, left_minus_right_db
    balance = [(300, 0), (1000, 0), (2400, -4), (4400, -2.5), (8000, 0), (15000, 1.5)]
    top_hz = 16000
    ports = np.array([colour(dry[k], [(hz, sign * db / 2) for hz, db in balance])
                      for k, sign in enumerate((1, -1))])
    rounded = np.tanh(2.5 * ports) / 2.5
    return signal.sosfilt(signal.ellip(8, .2, 60, top_hz, fs=SR, output="sos"), rounded)


dry = scene()
out = record(dry)
generate_wav(out)
```